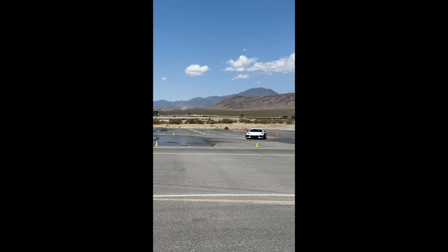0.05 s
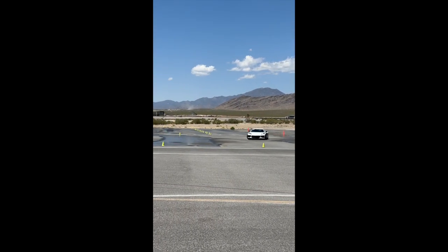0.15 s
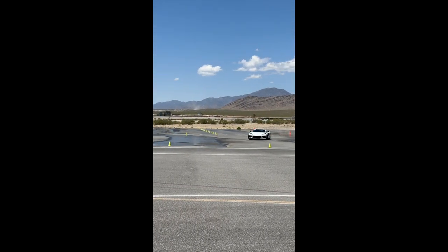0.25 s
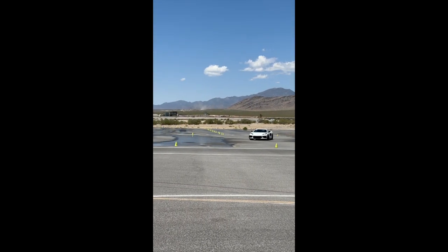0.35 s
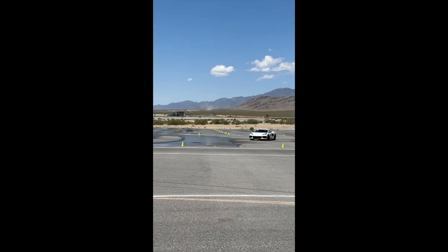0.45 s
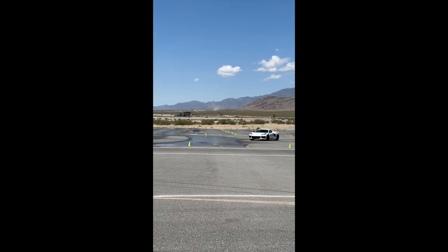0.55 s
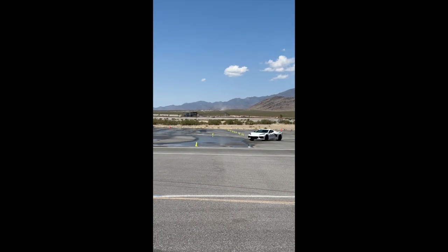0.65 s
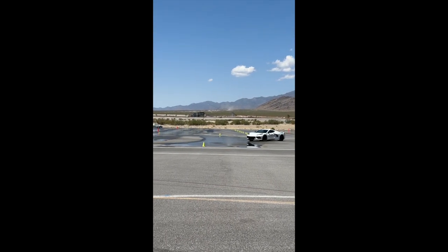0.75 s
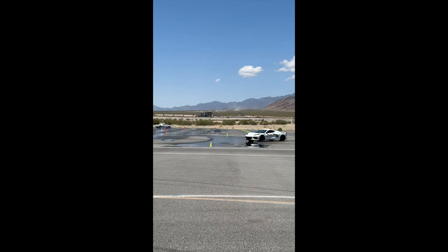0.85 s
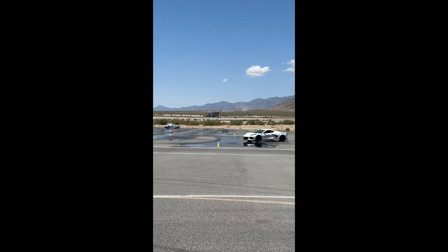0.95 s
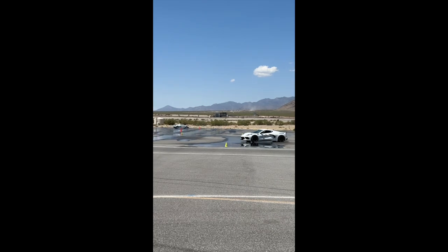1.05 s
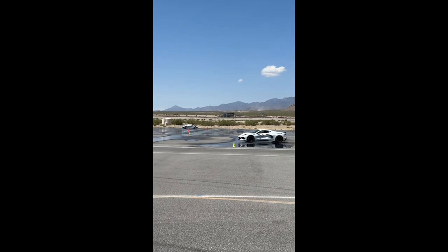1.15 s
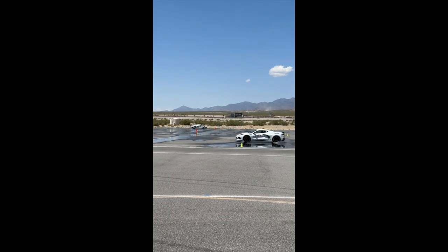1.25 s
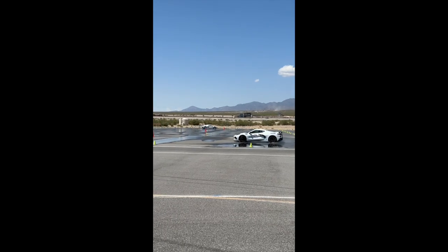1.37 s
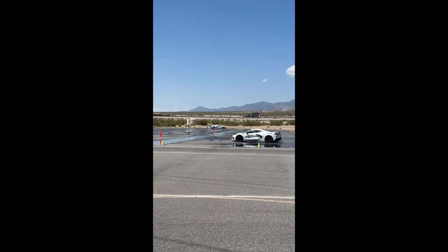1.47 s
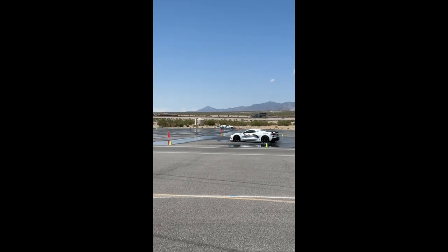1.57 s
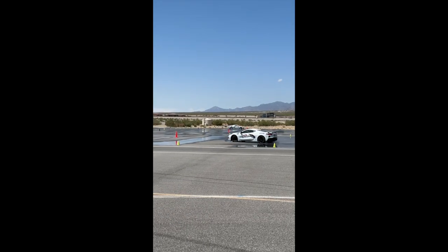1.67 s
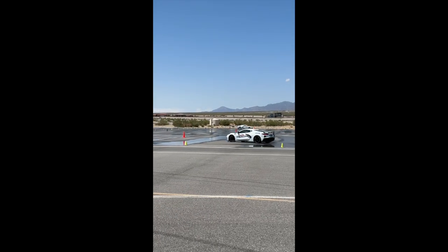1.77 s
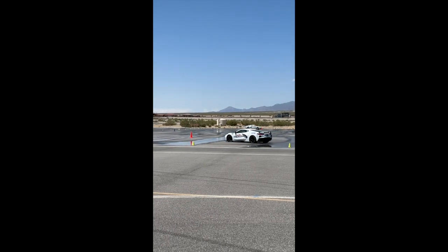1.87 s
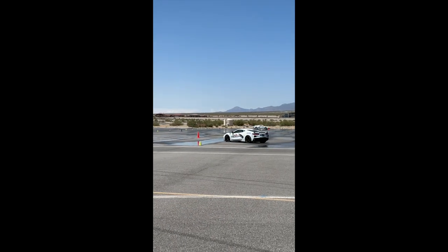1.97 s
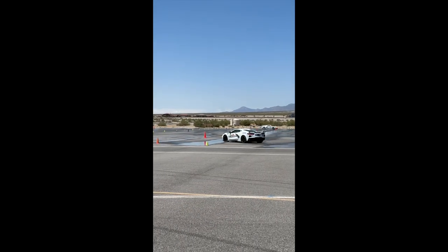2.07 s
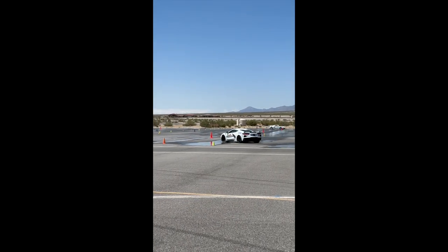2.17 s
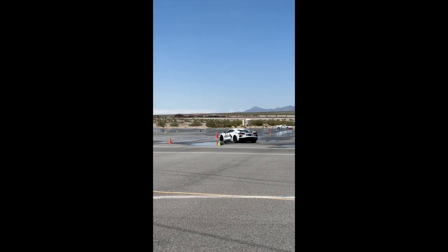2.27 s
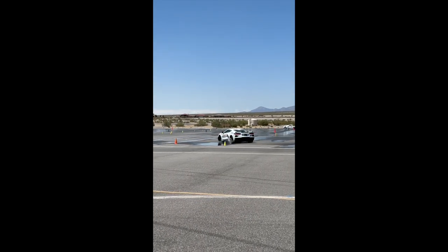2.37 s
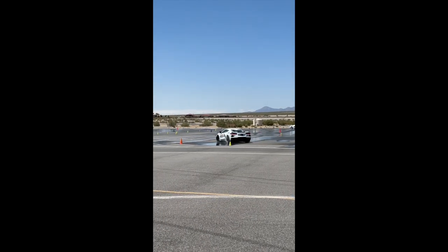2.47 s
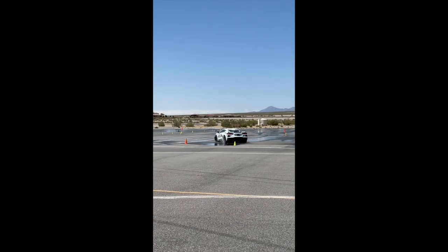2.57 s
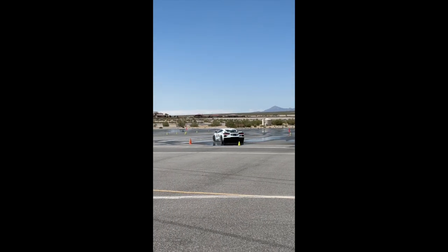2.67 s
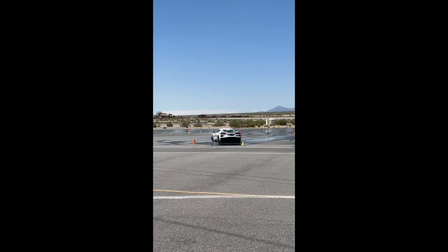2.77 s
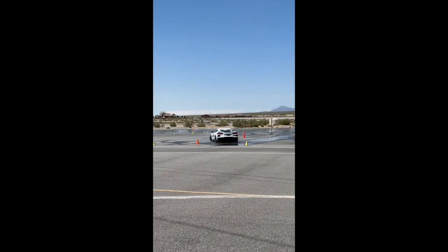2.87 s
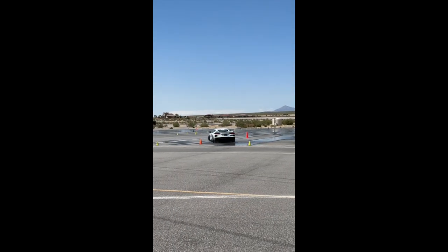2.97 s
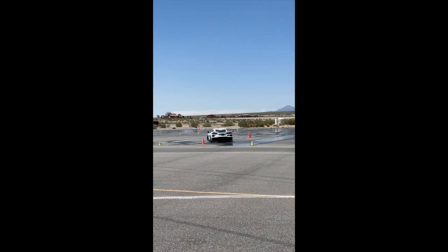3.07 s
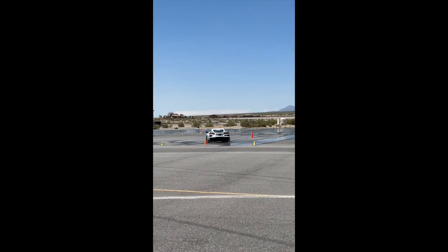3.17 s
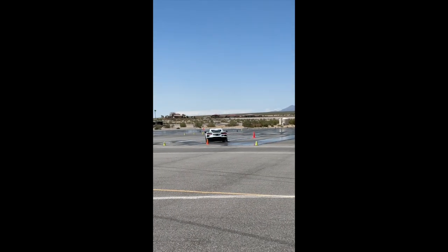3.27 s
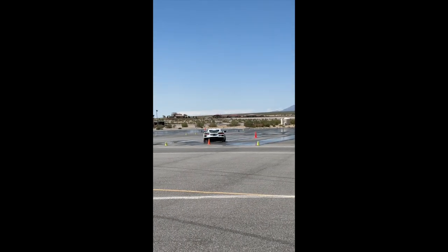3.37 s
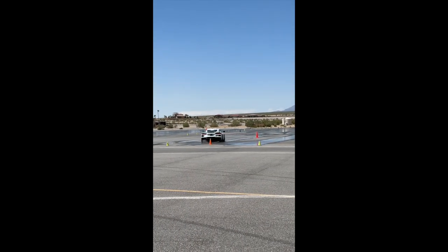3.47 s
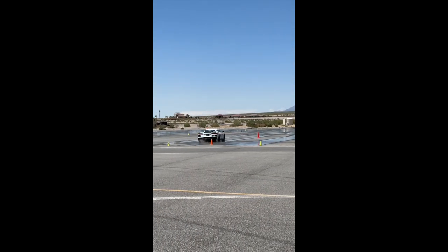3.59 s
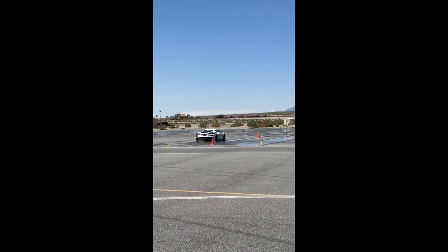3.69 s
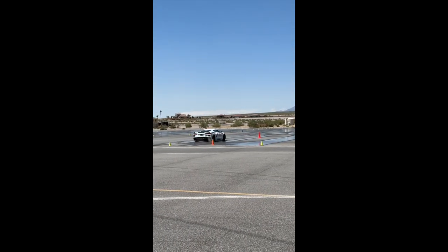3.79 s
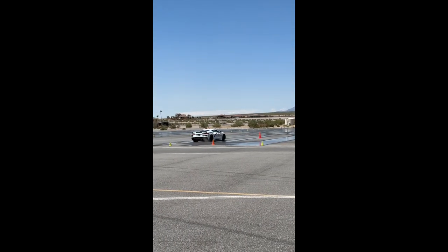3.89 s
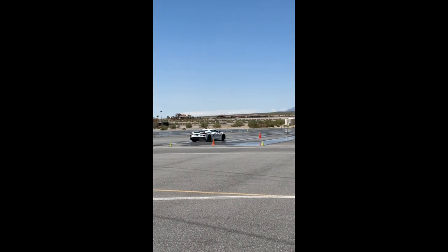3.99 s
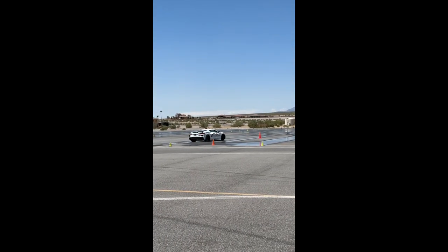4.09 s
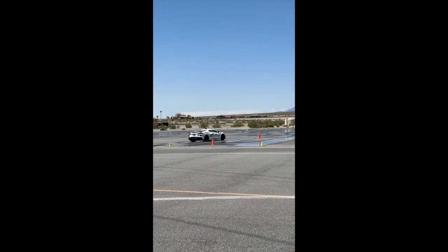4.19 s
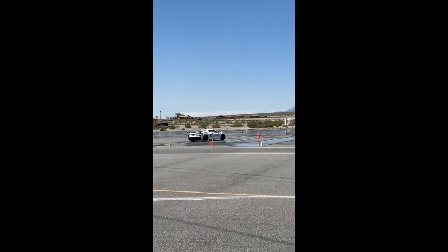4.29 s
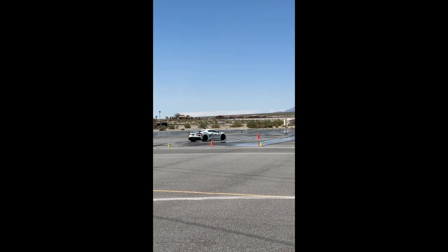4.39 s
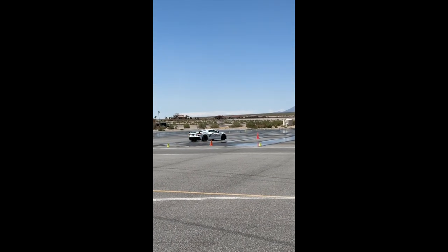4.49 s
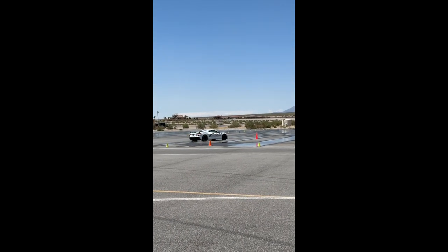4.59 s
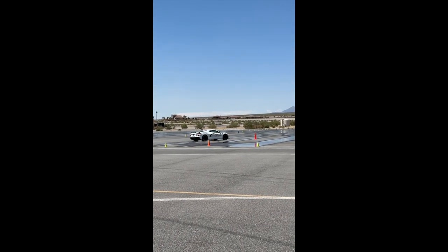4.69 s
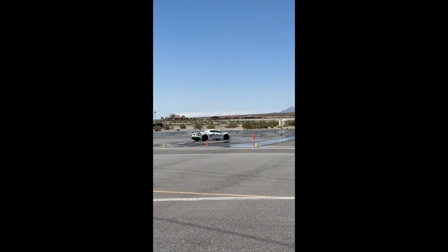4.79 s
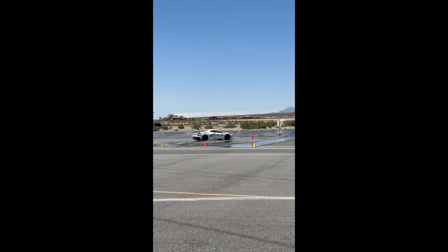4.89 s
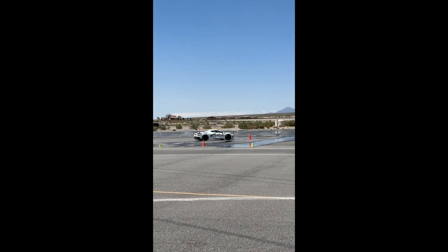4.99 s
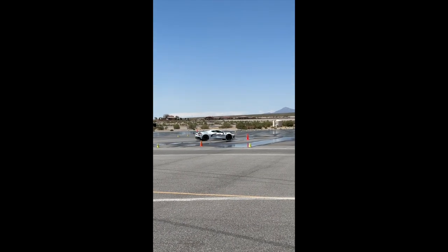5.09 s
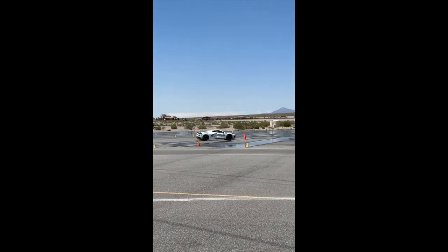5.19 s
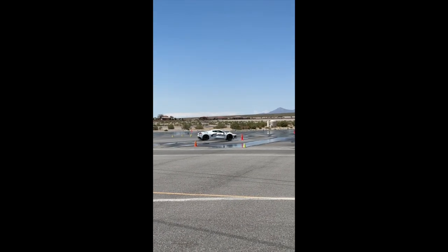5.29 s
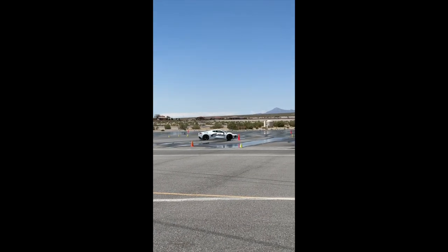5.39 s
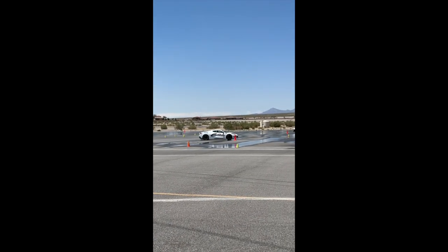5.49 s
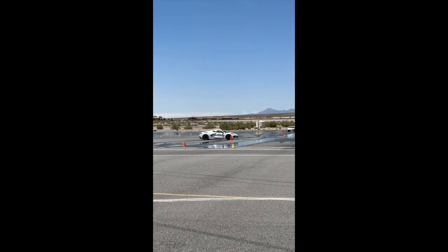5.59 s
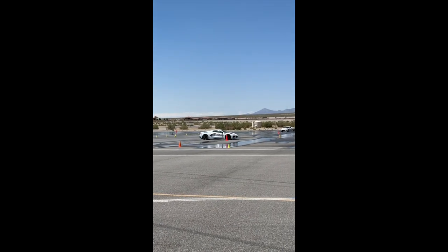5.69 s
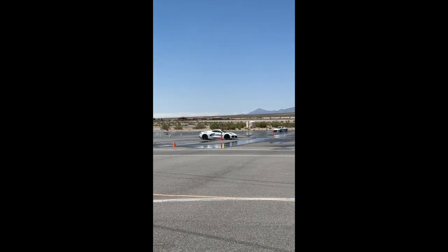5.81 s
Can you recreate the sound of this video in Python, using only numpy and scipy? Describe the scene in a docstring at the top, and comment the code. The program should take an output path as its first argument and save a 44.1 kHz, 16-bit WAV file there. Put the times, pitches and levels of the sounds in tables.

```python
"""Sports car sliding on a wet lot

A V8 car slides on a wet open lot, some way off, its engine built from tones locked to the crank's turning.
The intake growls while the car faces the microphone; the exhaust booms as it turns away, with a few pops.
Shaped noise makes the tyres' scrub and spray; unsteady tones make one long squeal and later a run of chirps.
Distant traffic rumbles and drones, wind puffs, and decaying tones make a bump on the microphone at the end."""
import sys
import numpy as np
from scipy import signal
from scipy.fft import rfft, irfft, next_fast_len
from scipy.io import wavfile
from scipy.ndimage import uniform_filter1d, minimum_filter1d, map_coordinates

SR = 44100
rng = np.random.default_rng(int(sys.argv[2]) if len(sys.argv) > 2 else 0)


def generate_wav(sig):
    """Save sig (samples, or channels by samples) to the path in sys.argv[1] as 16-bit PCM at SR."""
    pcm = np.round(np.clip(np.atleast_2d(sig).T, -1, 1) * 32767).astype(np.int16)
    wavfile.write(sys.argv[1], SR, pcm)


N = 257984  # length in samples

# Levels here are starting levels: the functions add further gains, some of them large, when they mix the parts.
# Spectra give the shape of a sound, with the level of each Hz of bandwidth.

# rumble of far traffic, also used for the thud of a pop: f/Hz, level/dB
RUMBLE_SPECTRUM = [(20, -50.5), (35, -28.5), (50, -17), (65, 0.5), (95, -4), (130, -11), (200, -15),
                   (320, -19.5), (385, -19.5), (470, -24), (1000, -34), (6000, -100)]
# another car passing far off: t/s, level of its drone/dB
DRONE_LEVEL = [(0, -43.5), (3.45, -46), (3.6, -28), (4.2, -30), (4.65, -31.5), (4.9, -30.5), (5.85, -49)]
# drone pitch; light wind and its swing; far rumble
DRONE_HZ, WIND_DB, WIND_SWING_DB, RUMBLE_DB = 90, -38, 0.5, -30
# light wind: f/Hz, level/dB
WIND_SPECTRUM = [(20, -34.5), (32, -20.0), (42, 0.0), (55, -3.5), (80, -9.5), (300, -49.0), (1000, -83.0)]
# puffs of wind on the microphones: start t/s, end t/s, level/dB
GUSTS = [(0.096, 0.198, -28), (0.287, 0.364, -36), (2.78, 3.003, -32.5), (3.07, 3.198, -26),
         (3.81, 4.0, -38.5), (5.76, 5.85, -35)]
# the flutter of those puffs: f/Hz, level/dB
BUFFET_SPECTRUM = [(20, -22.5), (45, -2), (70, 1), (130, 0), (250, -15.5), (500, -31.5), (1500, -72)]
# faint hiss, separate in each channel: f/Hz, level/dB
HISS_SPECTRUM = [(4500, -43), (6200, 1), (7200, -5), (8200, -3), (9500, -13), (12000, -20.5)]
# how loud the hiss is, quieter at the start: t/s, level/dB
HISS_LEVEL = [(0.8, -72), (1.2, -65.5), (2.8, -64.5), (5.8, -66.5)]
# bumps on the microphone: t/s, level/dB
BUMPS = [(5.824, -6), (5.832, -2.5), (5.8372, 4.5)]
# resonances of the microphone housing: f/Hz, level/dB, time to fall 60 dB/s
HOUSING_MODES = [(107, 2.5, 0.11), (244, 1, 0.036), (404, -39, 0.014)]
# the sound leans left in the middle range and is central in the treble: f/Hz, left minus right/dB
BALANCE = [(110, 0.12), (300, 0.86), (650, 4), (1100, 3.5), (1500, 0.27), (1900, 0)]
# sound scattered back by the lot: f/Hz, gain/dB
SCATTER_SPECTRUM = [(120, -30.5), (250, -23.5), (420, -7.0), (1000, -29.0), (2000, -51.0)]
TOP_HZ = 10300  # upper band limit of the recorder

# how hard the tread scrubs: t/s, level/dB
SCRUB_LEVEL = [(0, -41), (0.3, -39), (0.48, -43.5), (0.8, -34.5), (1.0, -34), (1.18, -32.5), (1.42, -42.5),
               (1.56, -32.5), (1.8, -33), (1.89, -31), (2.03, -23), (2.2, -26), (2.3, -20.5), (2.41, -19),
               (2.46, -30.5), (2.58, -30), (2.7, -44.5), (2.88, -40), (3.15, -37.5), (3.55, -32.5),
               (3.9, -32), (4.08, -36), (4.33, -43), (4.75, -33), (5.0, -35), (5.17, -45), (5.8, -44)]
# sound of the scrubbing tread: f/Hz, level/dB
SCRUB_SPECTRUM = [(100, -18), (250, -4), (400, -2), (560, 1.5), (740, 3.5), (1100, 1.5), (1450, -5),
                  (1850, -18.5), (2150, -19), (3500, -35), (7000, -71.5)]
# the tread's resonances, heard as a howl in hard scrubbing: f/Hz, level/dB
HOWL_SPECTRUM = [(200, -60.5), (400, -15.5), (660, -9.5), (810, 3), (930, -1.5), (1060, 2), (1220, -4.5),
                 (1450, -14.5), (1850, -8), (2150, -24), (2900, -28.5), (4000, -39), (8000, -85)]
# stretches of spray noise: start t/s, end t/s, level/dB
SPRAY_STRETCHES = [(0, 0.55, -60.5), (0.547, 1.067, -54), (1.065, 1.452, -50), (1.457, 1.707, -48),
                   (1.74, 2.41, -51), (3.137, 3.446, -53), (3.58, 3.929, -50.5)]
# thrown spray: f/Hz, level/dB
SPRAY_SPECTRUM = [(600, -9.5), (1500, 13), (1900, 12), (2400, 8), (3200, 4), (4300, 0), (5400, -6),
                  (6300, -6.5), (7300, -14), (8200, -18), (9200, -37.5), (12000, -47)]
# spray builds and settles (time constants); between stretches the damp road only hisses
SPRAY_RISE_S, SPRAY_FALL_S, DAMP_ROAD_DB = 0.013, 0.041, -57
# bursts of fine mist: start t/s, end t/s, level/dB
MIST = [(1.117, 1.216, -59), (1.25, 1.42, -66), (1.53, 1.615, -62.5)]
# mist: f/Hz, level/dB
MIST_SPECTRUM = [(3000, -14), (5500, 3), (7500, -5.5), (10000, -26)]
# a low moan under the slide: start t/s, end t/s, level/dB
MOANS = [(1.86, 2.7, -39)]
MOAN_HZ = 386.4
# hoarse scuffs of the tread: start t/s, end t/s, pitch f/Hz, level/dB
SCUFFS = [(1.085, 1.22, 998, -35), (1.227, 1.28, 741, -35), (1.495, 1.56, 1013, -38.5),
          (1.664, 1.71, 1050, -46), (1.755, 1.795, 765, -36.5), (1.849, 1.975, 870, -30),
          (3.678, 3.7, 936, -35.5), (3.775, 3.83, 1272, -34), (3.903, 3.925, 1289, -35),
          (4.011, 4.03, 1265, -33)]
# long squeal of the slide: t/s, pitch f/Hz, level/dB, octave level/dB
SLIDE = [(2.08, 910, -40.5, -54.5), (2.185, 930, -20.5, -29), (2.22, 921.2, -14.5, -35.5),
         (2.28, 915, -19.5, -32.5), (2.35, 880, -17, -23.5), (2.415, 860, -18, -31.5),
         (2.45, 831.4, -24, -26.5), (2.5, 848, -21.5, -37), (2.562, 828, -24, -38),
         (2.578, 929, -23.5, -29.5), (2.592, 1010, -23, -23.5), (2.606, 1130, -42.5, -59)]
INNER_RATIO, INNER_DB = 1.11, -7  # pitch and level of the inner tyre against the outer
# the tread bites and the squeal flares: start t/s, end t/s
BITES = [(2.214, 2.22), (2.245, 2.253), (2.265, 2.29), (2.292, 2.3), (2.322, 2.31), (2.349, 2.371),
         (2.381, 2.398), (2.408, 2.418), (2.494, 2.515), (2.526, 2.59), (2.557, 2.566)]
BITE_DB = 7  # the most that a bite lifts the squeal
# thinner squeal of spinning wheels: t/s, pitch f/Hz, level/dB, octave level/dB
SPIN = [(4.3, 1263, -53, -75), (4.38, 1205, -40, -55), (4.55, 1172, -34, -51), (4.72, 1260, -33, -49),
        (4.82, 1383, -32.5, -56), (4.87, 1409, -59, -75)]
# brief chirps as a tyre loses grip: t/s, pitch f/Hz, level/dB, octave level/dB
CHIRPS = [(0.835, 1375, -31, -60), (2.116, 1771, -21.5, -57.5), (4.207, 1258, -22.5, -58),
          (4.272, 1226, -19, -36.5), (4.31, 1284, -28, -58), (4.373, 1210, -29, -50),
          (4.41, 1219, -28.5, -46), (4.448, 1233, -31.5, -50), (4.525, 1199, -29, -44),
          (4.562, 1197, -29, -46), (4.596, 1208, -25, -44.5), (4.622, 1284, -22.5, -54),
          (4.66, 1240, -27, -44.5), (4.695, 1257, -24, -36.5), (4.724, 1323, -18.5, -50),
          (4.748, 1236, -32, -38), (4.778, 1389, -24.5, -51), (4.825, 1357, -22.5, -45)]
CHIRP_RISE_S, CHIRP_FALL_S = 0.073, 0.1  # time for each 60 dB of rise or fall

# exhaust pops: t/s, thud level/dB, crack level/dB
POPS = [(0.191, -30.5, -41), (0.889, -26.5, -50.5), (3.548, -38.5, -33), (3.564, -29.5, -21.5),
        (3.599, -33.5, -32)]
# the pipe rung by a pop: f/Hz, level/dB, time to fall 60 dB/s
POP_MODES = [(444, 4.5, 0.12), (810, 1.5, 0.06)]
# the tick of a pop: f/Hz, level/dB
TICK_SPECTRUM = [(300, -5.5), (1100, 1), (2000, -8), (2800, -16.5), (3400, -14.5), (4400, -24), (5500, -41),
                 (10000, -50)]

# engine speed: t/s, crankshaft turns per minute
REVS = [(0.06, 3880), (0.22, 4306), (0.46, 4010), (0.7, 4338), (0.92, 4790), (1.15, 3672), (1.65, 1917),
        (2.3, 1046), (2.72, 984.3), (3.05, 1554), (3.3, 1959), (3.55, 3220), (3.65, 3640), (3.76, 3670),
        (3.93, 3313), (4.13, 2667), (4.53, 2303), (4.68, 2651), (4.85, 3266), (4.99, 3594), (5.24, 3023),
        (5.39, 2860), (5.54, 2999), (5.85, 2190)]
FLYWHEEL_S = .06  # the speed is smoothed over this time
# presses of the throttle: start t/s, lift t/s, depth 0-1
PRESSES = [(0.01, 0.18, 0.76), (0.42, 0.7, 0.73), (0.64, 0.87, 0.94), (0.9, 1.3, 0.05), (2.55, 2.8, 0.1),
           (2.73, 3.46, 0.95), (3.4, 3.58, 0.68), (3.98, 4.22, 0.46), (4.2, 4.5, 0.25), (4.5, 4.96, 0.73),
           (5.28, 5.68, 0.55)]
OPEN_S, CLOSE_S = 0.054, 0.14  # time constants: the load builds up, and dies away after a lift
# the car turns: t/s, angle/degrees (0 is nose-on, 180 is tail-on)
HEADING = [(0, 5.9), (0.68, 45), (0.86, 59), (1.3, 100), (2.0, 145), (2.4, 120), (2.62, 147), (3.0, 177.3),
           (3.47, 182.5), (3.6, 157), (3.75, 131.5), (4.6, 106), (5.85, 81)]
# how the car sounds from each side: angle/degrees, intake/dB, exhaust bass/dB, overtones/dB
FACING = [(0, 0.5, -2, -18), (34.8, -1.5, -4, -28.5), (51.8, 2.5, 2.5, -4), (100, -18, 1.5, -7),
          (117.3, -39, -2, 1), (130.5, -47, -3.5, -14.5), (158.8, -49, 1.5, -0.5), (180.3, -52, 10.5, -3.5)]
# In the next four tables an order is a multiple of the crankshaft speed.
# intake growl: order, level/dB
INTAKE_ORDERS = [(1, -14), (1.5, -5), (2, -11), (2.5, -5.5), (3, -1.5), (3.5, -11.5), (4, -4.5), (5, -11),
                 (6, -12), (8, -22), (8.5, -22), (9, -28)]
# exhaust overtones: order, level/dB
OVERTONE_ORDERS = [(8, 3), (10.5, -1), (12, 3), (16, -6), (20, -9)]
# exhaust burble: order, level/dB
BURBLE_ORDERS = [(1, -5), (2, -0.5), (2.5, 5), (3, -15.5), (3.5, -11.5), (4.5, -10.5), (5, -11), (5.5, -10),
                 (6, -15), (7, -14), (7.5, -14), (9, -21.5)]
# the orders that ring the tailpipe's mouth: order, level/dB
BARK_ORDERS = [(8, 0.5), (9, -5.5), (10, -3.5), (10.5, -4.5), (12, -1), (14, -11.5), (16, -9.5)]
# exhaust gas noise: f/Hz, level/dB
RASP_SPECTRUM = [(60, -46), (150, 12), (300, 1.5), (440, 2), (560, -10.5), (800, -1.5), (1400, -21.5),
                 (3000, -33), (8000, -49)]
# the exhaust pipe's resonances: f/Hz, gain/dB
PIPE = [(80, -6.5), (130, 6), (180, 3), (240, -15), (320, -9), (400, -1.5), (450, 2), (520, -8), (585, -1),
        (640, -10), (720, -8.5), (900, -8.5), (2000, -25)]
# the airbox's resonances: f/Hz, gain/dB
AIRBOX = [(72, 10), (115, 2.5), (160, -8), (195, -6), (228, 4), (272, 8), (305, -11), (345, 5.5),
          (385, -11.5), (420, -16), (448, 5), (600, -1)]
# each engine voice: level when coasting, and what full load adds
FIRING_DB, FIRING_LOAD_DB = -35.5, 12.5
OVERTONE_DB, OVERTONE_LOAD_DB = -40.5, 12
RASP_DB, RASP_LOAD_DB = -46.5, 17.5
BURBLE_DB, BURBLE_LOAD_DB = -40, 19.5
INTAKE_DB, INTAKE_LOAD_DB = -44, 23
# tailpipe bark: level at full load and tail-on, loss per degree off the tail, and resonance
BARK_DB, BARK_DB_PER_DEG, BARK_HZ, BARK_WIDTH_HZ = -31, 0.2, 435, 95
MUFFLED_RPM, MUFFLE_DB_PER_OCT = 3340, 25  # above this speed the silencer swallows the firing tone
BURBLE_RPM, BURBLE_DB_PER_OCT = 3680, 30.5  # the burble peaks at this speed and fades to both sides
LOPE = 0.33  # unevenly spaced firings in each bank make the rasp throb


def amp(db):
    """Turn decibels into a plain multiplier."""
    return 10 ** (np.asarray(db) / 20)


def unit(x):
    """Scale a sound to an rms level of 1."""
    return x / np.sqrt(np.mean(x ** 2) + 1e-20)


def curves(rows):
    """Draw straight lines through a table: one value per sample for each column after the time."""
    s, *cols = np.transpose(rows)
    return [np.interp(np.arange(N) / SR, s, c) for c in cols]


def wobble(rate):
    """A smooth random curve through 'rate' random points a second."""
    points = rng.standard_normal(int(N * rate / SR) + 4)
    return map_coordinates(points, [np.arange(N) * rate / SR])


def filtered(x, response):
    """Multiply each frequency of x by the response there."""
    m = next_fast_len(N + SR // 2)
    hz = np.fft.rfftfreq(m, 1 / SR)
    return irfft(rfft(x, m) * response(hz), m)[..., :N]


def coloured(x, spectrum):
    """Shape x by (f/Hz, gain/dB) points joined on a log frequency axis."""
    f, db = np.transpose(spectrum)
    return filtered(x, lambda hz: amp(np.interp(np.log(hz + 1), np.log(f), db)))


def rush(spectrum, patchy_db):
    """Shaped noise of rms 1, with random louder and softer patches in time and frequency."""
    z = signal.stft(rng.standard_normal(N), nperseg=512)[2]
    field = uniform_filter1d(rng.standard_normal(z.shape), 5, 0)
    field = uniform_filter1d(field, 9, 1)
    patchy = signal.istft(z * amp(patchy_db * unit(field)), nperseg=512)[1][:N]
    return unit(coloured(patchy, spectrum))


def held(rows, rise_s, fall_s):
    """Envelope of (start, end, size) events: each eases up towards its size, then dies away after its end."""
    t = np.arange(N) / SR
    events = []
    for start, end, size in rows:
        rise = 1 - np.exp(-np.maximum(t - start, 0) / rise_s)
        fall = np.exp(-np.maximum(t - end, 0) / fall_s)
        events.append(size * rise * fall)
    return np.max(events, axis=0)


def sounding(rows):
    """Gate that is open from a table's first time to its last."""
    t = np.arange(N) / SR
    return np.clip((t - rows[0][0]) / .02, 0, 1) * (t < rows[-1][0])


def struck(blows, modes, attack_s):
    """Blows ring a body: each of its resonances is a sine that starts softly and dies away."""
    ringing = np.zeros(N)
    for s, db in blows:
        t = np.maximum(np.arange(N) / SR - s, 0)  # time since the blow
        for hz, level, t60 in modes:
            decay = amp(db + level - 60 * t / t60)
            ringing += decay * (1 - np.exp(-t / attack_s)) * np.sin(2 * np.pi * hz * t)
    return ringing


def traffic():
    """Other cars far away make a noise rumble and a sine drone; light wind nudges the microphone."""
    rumble = amp(RUMBLE_DB + 0.79 * wobble(5.8)) * rush(RUMBLE_SPECTRUM, patchy_db=1.5)
    drone_db, = curves(DRONE_LEVEL)
    drone = np.sin(2 * np.pi * np.cumsum(DRONE_HZ + 1.3 * wobble(6.2)) / SR)
    wind_db = WIND_DB + WIND_SWING_DB * wobble(5.4)
    wind = rush(WIND_SPECTRUM, patchy_db=3.0)
    return rumble + amp(drone_db) * unit(drone) + amp(wind_db) * wind


def hiss():
    """Faint shaped noise, separate in each channel and quieter at the start."""
    hiss_db, = curves(HISS_LEVEL)
    return np.array([amp(hiss_db) * rush(HISS_SPECTRUM, patchy_db=2.0) for _ in range(2)])


def buffets():
    """Puffs of wind flutter on each microphone port separately, as low noise."""
    force = held([(start, end, amp(db)) for start, end, db in GUSTS], 0.02, 0.03)
    flutter = [unit(amp(3.6 * wobble(28)) * rush(BUFFET_SPECTRUM, patchy_db=2.0)) for _ in range(2)]
    return force * np.array(flutter)


def bumps():
    """Soft knocks make the microphone's housing thud at its resonances."""
    return struck(BUMPS, HOUSING_MODES, attack_s=0.0019)


def water():
    """Stretches of spray noise and fine mist swell and settle; the damp road hisses in between."""
    stretches = held([(start, end, amp(db)) for start, end, db in SPRAY_STRETCHES], SPRAY_RISE_S, SPRAY_FALL_S)
    spray_size = np.hypot(amp(DAMP_ROAD_DB), stretches) * amp(2.5 + 0.43 * wobble(25))
    spray = spray_size * rush(SPRAY_SPECTRUM, patchy_db=2.5)
    mist_size = held([(start, end, amp(db)) for start, end, db in MIST], .03, .04)
    return spray + mist_size * rush(MIST_SPECTRUM, patchy_db=1.0)


def scrub_and_howl():
    """Sliding tread scrubs as noise up to a ceiling; scrubbing harder adds a juddering howl."""
    scrub_db, = curves(SCRUB_LEVEL)
    scrub_size = amp(np.minimum(scrub_db, -31) - 1.0 + 0.09 * wobble(27))
    scrub = scrub_size * rush(SCRUB_SPECTRUM, patchy_db=2.5)
    excess = np.sqrt(np.maximum(amp(scrub_db) ** 2 - amp(-33.0) ** 2, 0))  # power above -33 dB
    judder = amp(1.3 * wobble(70))
    howl = excess * judder * amp(-1.0) * rush(HOWL_SPECTRUM, patchy_db=1.5)
    return scrub + howl


def moan():
    """The sliding tyres' walls shudder at a low pitch, made fuzzy by random changes of size and phase."""
    angle = 2 * np.pi * MOAN_HZ * np.arange(N) / SR
    fuzzy = unit(wobble(45) * np.sin(angle) + wobble(45) * np.cos(angle))
    return held([(start, end, amp(db)) for start, end, db in MOANS], .08, .15) * fuzzy


def squeal(hz, level_db, octave_db, jitter, flutter_db, flutter_rate, third_db, rough_db, rough_hz):
    """Tread sticks and slips at a wandering pitch; blocks slipping out of step roughen the tone."""
    wandering_hz = hz * (1 + jitter * wobble(280) + .01 * wobble(35))
    phase = 2 * np.pi * np.cumsum(wandering_hz) / SR

    def partial(angle):
        """A sine widened by random sidebands."""
        rough = wobble(rough_hz) * np.sin(angle) + wobble(rough_hz) * np.cos(angle)
        return unit(np.sin(angle) + amp(rough_db) * rough)

    grip = unit(amp(flutter_db * np.tanh(wobble(flutter_rate))))
    upper = partial(2 * phase) + amp(third_db) * partial(3 * phase)
    return grip * (amp(level_db) * partial(phase) + amp(octave_db) * upper)


def scuffs():
    """Tread that nearly squeals: hoarse swells with only a rough pitch."""
    hz, = curves([(s, pitch) for start, end, pitch, _ in SCUFFS for s in (start, end)])
    hoarse = squeal(hz, 0, -28, jitter=.1, flutter_db=2.5, flutter_rate=120,
                    third_db=-14, rough_db=0, rough_hz=480)
    return held([(start, end, amp(db)) for start, end, _, db in SCUFFS], 0.0042, 0.0087) * hoarse


def thin_squeal(hz, level_db, octave_db):
    """The thin, fluttering stick-slip tone of a wheel losing grip."""
    return squeal(hz, level_db, octave_db, jitter=.027, flutter_db=2, flutter_rate=150,
                  third_db=-14, rough_db=-11, rough_hz=200)


def wheelspin():
    """Spinning wheels keep up a faint thin squeal; brief chirps break out, each at its own pitch."""
    t = np.arange(N) / SR
    hz, *levels = curves(SPIN)
    spin = thin_squeal(hz, *levels) + thin_squeal(1.06 * hz, *levels)  # two wheels, slightly out of tune
    chirp_hz, chirp_db, octave_db = curves(CHIRPS)
    away = [np.maximum((s - t) / CHIRP_RISE_S, (t - s) / CHIRP_FALL_S) for s, *_ in CHIRPS]
    fade_db = -60 * np.min(away, axis=0)  # loudest at each chirp's time
    chirps = thin_squeal(chirp_hz, chirp_db + fade_db, octave_db + fade_db)
    return amp(-6.5) * sounding(SPIN) * spin + amp(-4.0) * chirps


def tyre_cry(hz, level_db, octave_db):
    """The full stick-slip tone of one tyre in the long slide."""
    return squeal(hz, level_db, octave_db, jitter=.034, flutter_db=1.2, flutter_rate=140,
                  third_db=-19, rough_db=-11, rough_hz=260)


def slide():
    """Both rear tyres cry, the inner one higher and weaker; they flare together as the tread bites."""
    hz, db, octave_db = curves(SLIDE)
    outer = tyre_cry(hz, db, octave_db)
    inner = amp(INNER_DB) * tyre_cry(INNER_RATIO * hz, db, octave_db - 7)
    bite = amp(BITE_DB * held([(start, end, 1) for start, end in BITES], .0015, 0.0023))
    return amp(-3.5) * sounding(SLIDE) * bite * (outer + inner)


def tyres():
    """Wet tread makes water noise, scrubs and howls, and sticks and slips into moans and squeals."""
    return water() + scrub_and_howl() + moan() + scuffs() + wheelspin() + slide()


def burst(s, rise_s, fall_s):
    """Envelope peaking at time s; rise and fall are the times for 60 dB."""
    t = np.arange(N) / SR
    return amp(-60 * np.maximum((t - s) / fall_s, (s - t) / rise_s))


def pops():
    """Unburnt fuel thuds in the pipe as low noise; the crack rings the pipe, with a light tick of noise."""
    thuds = sum(amp(db) * burst(s, 0.025, 0.18) for s, db, _ in POPS)
    thud = amp(10.5) * thuds * unit(coloured(rng.standard_normal(N), RUMBLE_SPECTRUM))
    ring = struck([(s, db) for s, _, db in POPS], POP_MODES, attack_s=0.00088)
    ticks = sum(amp(db) * burst(s, 0.01, 0.089) for s, _, db in POPS)
    tick = amp(-7.5) * ticks * unit(coloured(rng.standard_normal(N), TICK_SPECTRUM))
    return thud + ring + tick


def orders(crank, table, waver_db, waver_rate):
    """Sines locked to the crank angle, each wavering in level on its own."""
    total = np.zeros(N)
    for k, db in table:
        level = amp(db + waver_db * wobble(waver_rate))
        total += level * np.sin(k * crank + rng.uniform(0, 2 * np.pi))
    return np.sqrt(2) * total


def voices(rpm):
    """Levels (dB) of the six engine voices, from load, speed and the way the car faces."""
    load = held(PRESSES, OPEN_S, CLOSE_S)
    heading, = curves(HEADING)
    degrees, *lobes = np.transpose(FACING)
    intake_lobe, bass_lobe, overtone_lobe = [np.interp(heading, degrees, lobe) for lobe in lobes]
    off_tail = np.abs(heading - 180)
    muffled = MUFFLE_DB_PER_OCT * np.maximum(np.log2(rpm / MUFFLED_RPM), 0)
    off_peak = BURBLE_DB_PER_OCT * np.abs(np.log2(rpm / BURBLE_RPM))
    firing_db = FIRING_DB + FIRING_LOAD_DB * load + bass_lobe - muffled
    overtone_db = OVERTONE_DB + OVERTONE_LOAD_DB * load + overtone_lobe
    rasp_db = RASP_DB + RASP_LOAD_DB * load + overtone_lobe
    burble_db = BURBLE_DB + BURBLE_LOAD_DB * load + bass_lobe - off_peak
    intake_db = INTAKE_DB + INTAKE_LOAD_DB * load + intake_lobe
    bark_db = BARK_DB + OVERTONE_LOAD_DB * (load - 1) - BARK_DB_PER_DEG * off_tail
    return firing_db, overtone_db, rasp_db, burble_db, intake_db, bark_db


def tailpipe_mouth(hz):
    """The pipe's mouth lets through a band around its resonance."""
    return 1 / (1 + ((hz - BARK_HZ) / BARK_WIDTH_HZ) ** 2) ** 2


def gas_rasp(rpm, crank, fire, rasp_db):
    """Exhaust gas rushes out in a puff of noise at each firing, and grows noisy as the revs rise."""
    flow = np.clip(rpm / 2100, 0, 1) ** 2
    throb = np.sin(1.5 * crank)
    puffs = (1 + 0.91 * fire) ** 2 * (1 + LOPE * throb)
    return flow * amp(rasp_db) * unit(coloured(rng.standard_normal(N) * puffs, RASP_SPECTRUM))


def engine():
    """Four firings a turn make the main tone; unequal cylinders fill in the half orders."""
    rpm = uniform_filter1d(curves(REVS)[0], int(FLYWHEEL_S * SR))
    firing_db, overtone_db, rasp_db, burble_db, intake_db, bark_db = voices(rpm)
    crank = 2 * np.pi * np.cumsum(rpm) / 60 / SR  # crank angle in radians
    crank = crank + .012 * wobble(45)
    fire = np.sin(4 * crank)
    tone = np.sqrt(2) * amp(firing_db + 0.44 * wobble(25)) * fire
    uneven = unit(amp(2.5 * wobble(70)))  # flicker shared by overtones and bark
    overtones = amp(overtone_db - 3.5) * orders(crank, OVERTONE_ORDERS, waver_db=2, waver_rate=15)
    overtones = uneven * coloured(overtones, PIPE)
    bark = amp(bark_db) * orders(crank, BARK_ORDERS, waver_db=0.0, waver_rate=25)
    bark = uneven * filtered(bark, tailpipe_mouth)
    burble = amp(burble_db - 3.5) * orders(crank, BURBLE_ORDERS, waver_db=2, waver_rate=16)
    intake = amp(intake_db) * orders(crank, INTAKE_ORDERS, waver_db=2, waver_rate=14)
    intake = coloured(intake, AIRBOX)
    rasp = gas_rasp(rpm, crank, fire, rasp_db)
    return tone + overtones + bark + burble + intake + rasp


def scattered(near):
    """The open lot scatters a little sound back from all sides, as a fading random echo in each channel."""
    t = np.arange(SR // 2) / SR
    tail = rng.standard_normal((2, len(t))) * amp(-60 * t / .55)  # falls 60 dB in 0.55 s
    scatter = signal.fftconvolve(near[None], tail / np.linalg.norm(tail[0]), axes=1)[:, :N]
    return coloured(scatter, SCATTER_SPECTRUM)


def scene():
    """Mix the nearly central car and traffic with the sounds that differ between the two channels."""
    near = tyres() + pops() + engine()
    centre = traffic() + bumps() + near
    # half of the difference goes to each side
    pair = np.array([coloured(centre, [(hz, side * db / 2) for hz, db in BALANCE]) for side in (1, -1)])
    return pair + scattered(near) + hiss() + buffets()


def record(dry):
    """The recorder cuts the deep bass, ducks the highest peaks and cuts steeply above its band limit."""
    opening = np.clip(np.arange(N) / SR / .004, 0, 1)  # 4 ms fade-in
    bass_cut = signal.butter(2, 28, "highpass", fs=SR, output="sos")
    lean = signal.sosfilt(bass_cut, opening * dry)
    needed = .86 / np.maximum(np.abs(lean).max(axis=0), .86)  # gain that holds peaks to 0.86
    gain = uniform_filter1d(minimum_filter1d(needed, size=300), size=300)
    return filtered(gain * lean, lambda hz: 1 / (1 + (hz / TOP_HZ) ** 60))


dry = scene()
out = record(dry)
generate_wav(out)
```